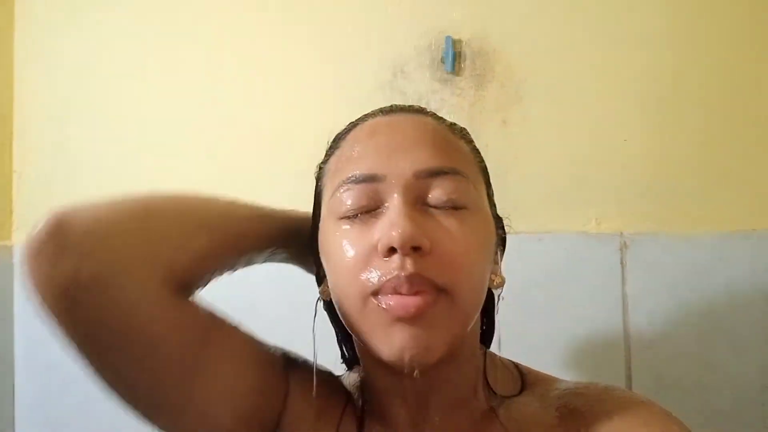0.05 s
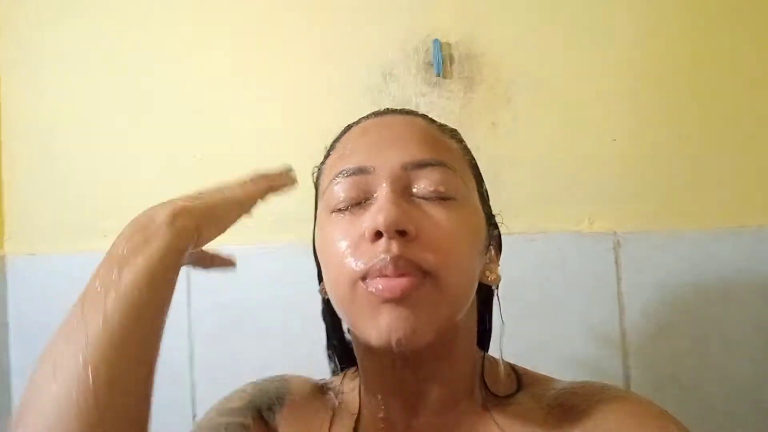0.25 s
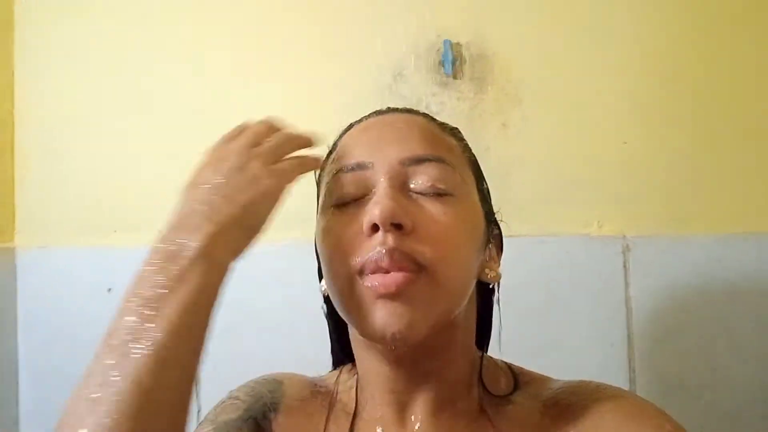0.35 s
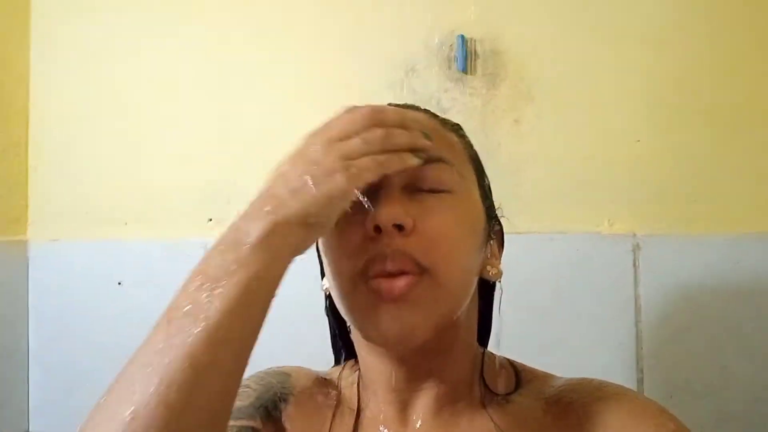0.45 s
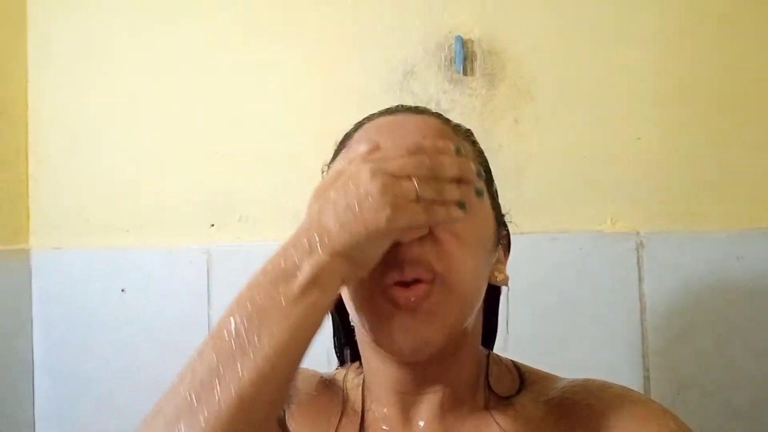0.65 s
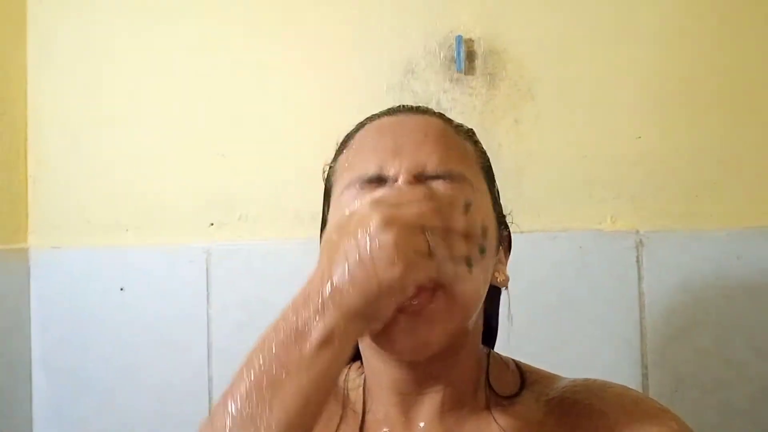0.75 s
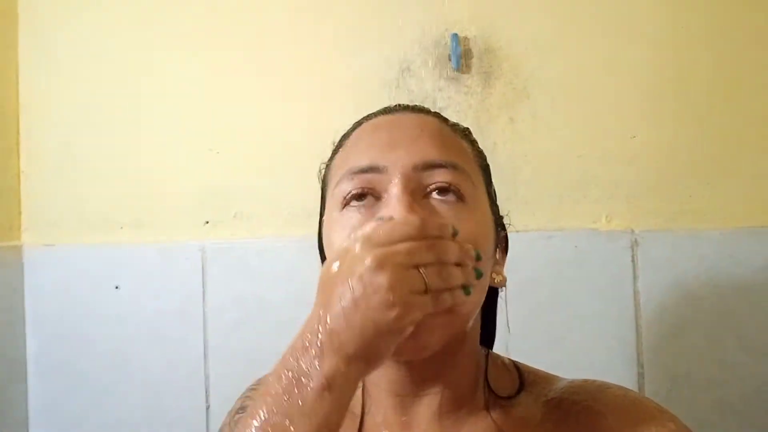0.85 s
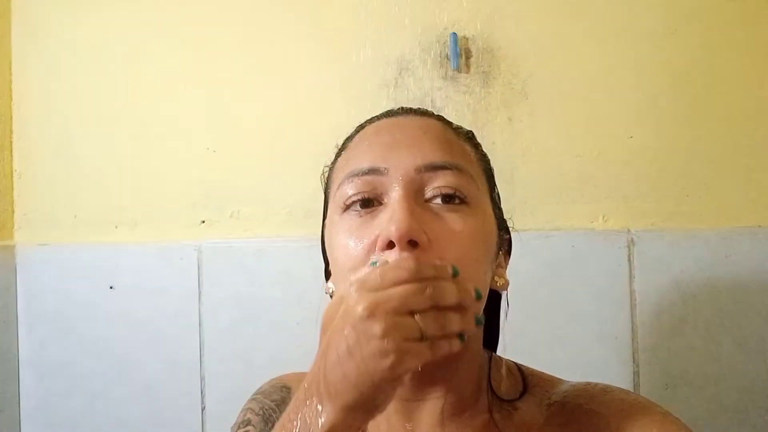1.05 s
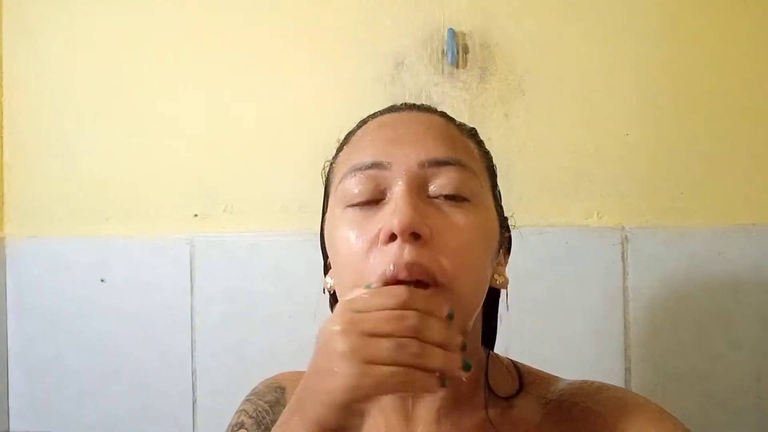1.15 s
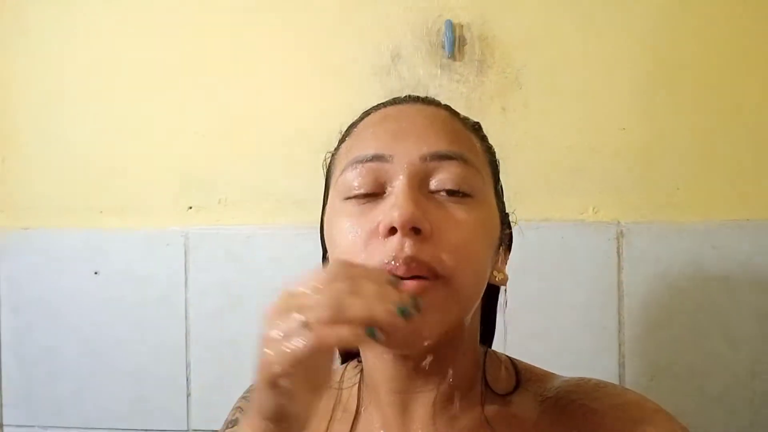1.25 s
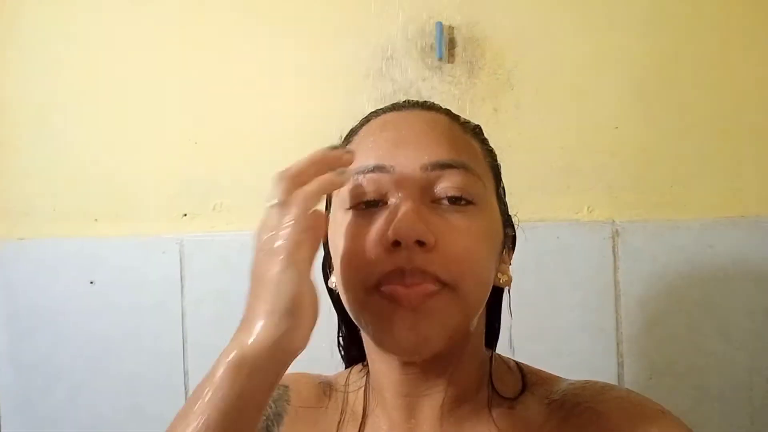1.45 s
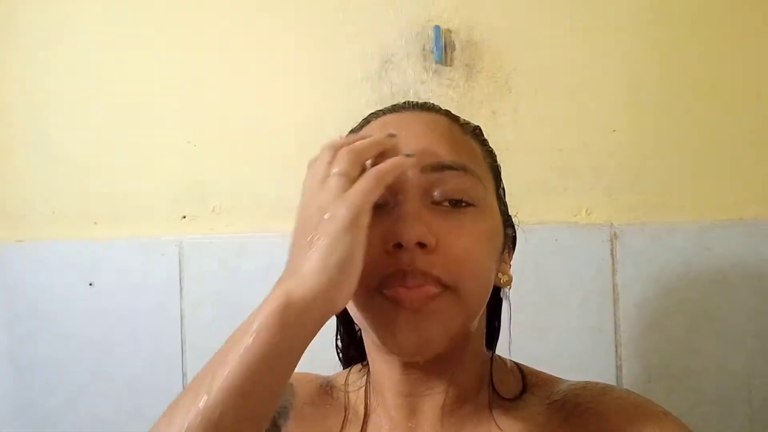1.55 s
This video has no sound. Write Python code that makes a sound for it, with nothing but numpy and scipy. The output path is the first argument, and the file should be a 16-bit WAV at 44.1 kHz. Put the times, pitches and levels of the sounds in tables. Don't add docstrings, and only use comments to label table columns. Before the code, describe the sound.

In a small, ringing tiled stall, close-miked water patters steadily, broken by a loud early splash and drain knock, fine ticking drops, low puffs from a moving hand, faint squelches and a few pitched drips.

```python
import sys
import numpy as np
from scipy import signal
from scipy.fft import rfft, irfft
from scipy.io import wavfile
from scipy.ndimage import uniform_filter1d

SR = 44100
rng = np.random.default_rng(int(sys.argv[2]) if len(sys.argv) > 2 else 0)


def amplitude_ratio(level_db):
    exponent = np.asarray(level_db, float) / 20
    return 10 ** exponent


def put_to_file(sound):
    columns = np.atleast_2d(sound).T
    safe = np.clip(columns, -1, 1)
    whole_steps = np.round(safe * 32767)
    wavfile.write(sys.argv[1], SR, whole_steps.astype(np.int16))


N = 70560
T = np.arange(N) / SR

# (time [s], level [dB])
FLOW = [(0.0, -40), (0.196, -35.5), (0.32, -44.5), (0.632, -30.5), (0.788, -29.5), (.9, -33.5),
        (.97, -34.5), (1.07, -35), (1.18, -33), (1.27, -36.5), (1.35, -36.5), (1.6, -39.5)]
# (frequency [Hz], density [dB per Hz])
PATTER_COLOUR = [(88, -62), (150, -27), (566, -20.5), (774, -17), (1020, -13.5), (7040, -3.5), (8560, -15),
                 (12400, 5.5), (16000, -14)]
# (frequency [Hz], density [dB per Hz])
RUMBLE_COLOUR = [(15, -46), (25, -19), (65, 6), (188, -10), (246, 1.5), (400, -46), (520, -50), (880, -120)]
# (frequency [Hz], decay by 60 dB [s])
ROOM_T60 = [(300, 0.41), (1000, 0.52), (4000, 0.43), (9000, 0.49), (15000, 0.47)]
# (frequency [Hz], likeness [0-1])
ALIKE = [(60, 0.7), (300, 0.99), (700, 0.25), (1400, 0.19), (3000, 0.02)]
# (frequency [Hz], width [Hz], level [dB])
STALL_MODES = [(249, 18, 14), (575, 23.6, 9)]
# (time [s], level [dB], centre [Hz], width / centre [ratio], burst [s])
SPLASHES = [(.144, -36, 7300, 0.16, 0.0085), (.19, -30, 7300, 0.18, .005), (0.248, -26, 4000, 2.3, 0.0044),
            (0.209, -21.5, 7500, 0.65, 0.0051), (0.205, -26, 4600, 0.39, 0.0043),
            (0.232, -20.5, 9000, 2.1, 0.03), (0.254, -9.5, 5100, 1.28, 0.0064),
            (0.253, -10.5, 12800, 0.29, 0.0087), (0.268, -11, 4500, 1.23, 0.01),
            (0.273, -17, 12700, 0.63, 0.0087), (0.29, -23, 2930, 0.27, 0.0058),
            (.557, -53, 11500, .3, .005), (0.59, -26, 4570, 0.49, 0.011),
            (0.672, -22.5, 11900, 1.44, 0.027), (0.768, -22, 4510, 0.48, 0.0066),
            (.69, -36, 2350, 0.87, 0.014), (0.848, -25, 12640, 0.91, 0.0088), (.198, -33.5, 3500, 1, .006),
            (0.141, -43.5, 2500, 0.43, 0.011), (0.986, -29.5, 6960, 0.42, .007),
            (1.091, -28, 12800, 0.56, 0.0033), (1.274, -36.5, 3800, 0.34, 0.0028),
            (1.294, -31.5, 6240, 0.3, 0.014), (1.342, -23.5, 11900, 0.71, 0.007),
            (1.471, -24, 10200, 1.07, 0.018), (1.5, -61, 4600, 0.34, 0.011),
            (1.544, -25.5, 13500, 0.31, 0.02)]
# (time [s], level [dB], pitch [Hz], ring
DRIPS = [(.142, -36, 1478, 32), (0.586, -50.5, 251, 19), (.715, -57, 253, 10), (1.275, -35, 3870, 20),
         (.147, -34, 2560, 12), (0.172, -32, 2420, 15), (0.688, -24, 2630, 29), (0.773, -35, 1485, 11),
         (0.903, -30.5, 2410, 18.7), (.941, -37, 2430, 12), (1.287, -30.5, 3730, 26),
         (1.391, -34.5, 1545, 11), (1.46, -43, 2197, 70)]
# (time [s], level [dB], centre [Hz], spit [s])
TICKS = [(.146, -23, 12300, 0.0033), (.165, -23, 12800, .003), (.189, -17.5, 11800, .003),
         (.202, -16, 12400, 0.0031), (0.234, -15, 13100, 0.0035), (.521, -33, 12600, .002),
         (0.557, -24, 11600, .002), (.573, -24, 12400, .002), (.601, -21.5, 12500, 0.0018),
         (0.674, -13, 12300, .002), (.705, -19, 12960, .002), (.743, -20, 13400, .002),
         (.753, -18, 14000, 0.0022), (0.77, -10.5, 12800, 0.0019), (.803, -15, 13000, 0.0025),
         (.846, -17.5, 13200, 0.003), (.862, -30, 13800, .002), (.949, -21, 12000, .002),
         (0.966, -16.5, 12700, 0.0024), (1.0917, -17, 14300, 0.0016), (1.152, -18.5, 11000, .002),
         (1.345, -21.5, 12000, 0.0034), (1.476, -20, 12300, .003), (1.312, -26, 12600, 0.0026),
         (1.391, -18, 13100, .002), (1.421, -19, 13930, 0.0023), (1.498, -30, 9000, .003),
         (1.567, -23, 8100, 0.0017)]
# (time [s], level [dB])
DRAIN_HITS = [(.22, -56), (.256, -31), (.275, -20), (.322, -28.5), (.344, -37.5), (.362, -48),
              (.405, -38.5), (.467, -44.5), (.58, -40), (.63, -39.5), (.665, -45.5), (.80, -51.5),
              (.84, -52.5), (1.33, -47), (1.46, -51), (1.49, -48), (1.515, -48.5), (1.545, -46.5)]
# (time [s], level [dB], length [s])
DRAUGHTS = [
    (0.236, -64, 0.072),
    (0.28, -56, 0.015),
    (0.944, -40.5, 0.018),
    (0.997, -44.5, 0.0074),
    (1.167, -54, 0.03),
    (1.32, -65, .07),
]
DRAUGHT_HZ = [54, 89, 156.5, 186, 75, 51]
# (time [s], level [dB], swing [Hz], length [s])
PUFFS = [
    (0.919, -40, 75, 0.0099),
    (0.9376, -33, 100, .003),
    (0.948, -25.5, 92, 0.0078),
    (0.993, -25, 100, 0.0069),
    (1.016, -35.5, 60.7, 0.016),
    (1.04, -44, 65, 0.013),
]
# (time [s], level [dB], centre [Hz], width / centre [ratio], burst [s])
WIPES = [(0.96, -49, 1900, 1.5, 0.092), (1.03, -48.5, 630, 1.7, 0.046), (1.14, -45.5, 1540, .4, .02),
         (1.112, -33, 3600, .25, 0.0037), (1.125, -41, 3500, 0.26, 0.005), (1.105, -36, 2440, 0.32, 0.015),
         (1.12, -38.5, 390, 0.68, 0.015), (1.06, -40, 960, 0.61, 0.0097), (.99, -46, 680, 0.37, 0.0039),
         (1.1, -42, 474, 0.73, 0.015), (1.25, -46.5, 3100, 0.37, 0.011), (1.27, -41, 2060, 0.79, .006),
         (1.235, -46, 526, 0.44, 0.012), (1.245, -50, 1460, 0.24, 0.021), (1.27, -57, 410, 0.45, 0.0085)]
# (time [s], level [dB], pitch [Hz], length [s])
POCKETS = [
    (1.061, -46, 1072, 0.0078),
    (1.088, -54, 1290, .005),
    (1.104, -46.5, 365, .016),
    (1.15, -48, 1417, .007),
    (1.168, -45, 1620, 0.0069),
    (1.191, -49, 1670, 0.0092),
]
# (frequency [Hz], gain [dB])
PHONE = [(200, -0.5), (2000, 3), (4300, 1), (5600, -1), (7000, 2.5), (8800, -2.5), (12500, -1), (15500, -2)]
# (frequency [Hz], left minus right [dB])
PORTS = [(60, -4), (380, 3), (700, -4), (1290, -4.5), (4400, -5), (8120, -5), (15000, -8)]

DRAIN_HZ, DRAIN_WIDTH_HZ = 769, 55


def rms1(x):
    return x / np.sqrt(np.mean(x ** 2))


def at(table, hz):
    table_hz, value = np.array(table).T
    return np.interp(np.log(hz), np.log(table_hz), value)


def band(x, hz, width):
    w = 2 * np.pi * min(hz, SR / 2.5) / SR
    a = np.sin(w) * np.sinh(np.arcsinh(width / 2) * w / np.sin(w))
    return signal.lfilter([a, 0, -a], [1 + a, -2 * np.cos(w), 1 - a], x)


def clicks(per_s, scatter_db):
    hit = rng.random(N) < per_s / SR
    push = rng.standard_normal(N)
    size = np.minimum(rng.exponential(size=N), 3)
    return rms1(hit * push * amplitude_ratio(scatter_db * size))


def walk(rate_hz):
    k = int(SR / rate_hz)
    steps = np.repeat(rng.standard_normal(N // k + 1), k)
    smooth = uniform_filter1d(uniform_filter1d(steps, k), k)
    return rms1(smooth[:N])


def burst(start, length):
    since = np.clip(T - start, 0, None)
    length = max(length, .001)
    rise = 1 - np.exp(-since / (0.26 * length))
    return rise * np.exp(-since / length)


def swell(start, length):
    return np.exp(-((T - start) / length) ** 2 / 2)


def swarm(start, length, per_s, scatter_db, hz, width):
    shape = burst(start, length)
    impacts = band(band(shape * clicks(per_s, scatter_db), hz, width), hz, width)
    return rms1(impacts) * np.sqrt(np.mean(shape ** 2))


def patter():
    drops_per_s, scatter_db, level_db = 1500, 2, -6
    swell_db, flicker_db = 1.4, 0
    together = walk(4.48)
    shared = clicks(drops_per_s / 4, scatter_db)
    out = 0
    for hz in 200 * 2 ** np.arange(0, 6.4, 1 / 3):
        drops = clicks(drops_per_s, scatter_db) + 0.7 * shared
        gain = amplitude_ratio(at(PATTER_COLOUR, hz) + swell_db * together + flicker_db * walk(5.4))
        out = out + gain * band(band(drops, hz, 0.42), hz, 0.42)
    return rms1(out) * amplitude_ratio(level_db + np.interp(T, *np.array(FLOW).T))


def pair(size):
    hz = np.arange(size // 2 + 1) * SR / size + 1
    mid, side = rfft(rng.standard_normal((2, size)))
    alike = np.clip(at(ALIKE, hz), 0, 1)
    return mid * np.sqrt(1 + alike) + side * np.sqrt(1 - alike) * np.array([[1], [-1]]), hz


def rumble():
    level_db, left_db = -68, -1.5
    noise, hz = pair(N)
    colour = amplitude_ratio(at(RUMBLE_COLOUR, hz) - 40 * (hz > 500) - 30 * (hz < 20))
    low = irfft(noise * colour, N) * amplitude_ratio(walk(10.2))
    return rms1(low) * amplitude_ratio(level_db + np.array([[left_db], [-left_db]]) / 2)


def room():
    size, first_wall_s = SR // 2, 0.0027
    noise, hz = pair(size)
    t, tail = T[:size], 0
    for centre in 125 * 2. ** np.arange(8):
        share = np.cos(np.pi / 2 * np.clip(np.log2(hz / centre), -1, 1)) ** 2
        tail = tail + irfft(noise * share, size) * amplitude_ratio(-60 * t / at(ROOM_T60, centre))
    tail = tail * np.clip(t / first_wall_s - 1, 0, 1)
    return tail / np.sqrt(np.mean(np.sum(tail ** 2, axis=1)))


def reverberate(x, count=6):
    spot_s, earlier_db = .006, -3
    step = int(spot_s * SR)
    spot = np.repeat(rng.integers(count, size=N // step + 1), step)[:N]
    wet = 0
    for k in range(count):
        share = np.sqrt(uniform_filter1d(1. * (spot == k), step // 4).clip(0))
        wet = wet + irfft(rfft(x * share, 2 * N) * rfft(room(), 2 * N), 2 * N)
    return wet[:, :N] + amplitude_ratio(earlier_db) * wet[:, N:]


def stall_boom(water):
    return sum(amplitude_ratio(db) * band(water, hz, wide / hz) for hz, wide, db in STALL_MODES)


def drain(water):
    trickle = amplitude_ratio(-40 + 1.1 * walk(12.4)) * clicks(240, 1.0)
    drive = amplitude_ratio(9.5) * water + trickle + slugs()
    return band(drive, DRAIN_HZ, DRAIN_WIDTH_HZ / DRAIN_HZ)


def splashes():
    thud = amplitude_ratio(-41) * swarm(.254, 0.028, 1500, 2.4, 580, 1.0)
    return thud + sum(amplitude_ratio(db) * swarm(start, length, 8000, 3.5, hz, 1.19 * width)
                      for start, db, hz, width, length in SPLASHES)


def drips():
    glide, flutter_db = 0.094, 3
    out = 0
    for start, db, hz, cycles in DRIPS:
        since = np.clip(T - start, 0, .2)
        life = cycles / hz / 2
        ring = np.sin(2 * np.pi * hz * since * (1 + glide * since / life / 8))
        out = out + amplitude_ratio(db + flutter_db * walk(300)) * burst(start, life) * ring
    return out


def ticks():
    return sum(amplitude_ratio(db) * swarm(start, length, 14000, 3.0, hz, 0.34) for start, db, hz, length in TICKS)


def slugs():
    out = 0
    for start, db in DRAIN_HITS:
        swing = np.sin(2 * np.pi * DRAIN_HZ * (T - start))
        out = out + amplitude_ratio(db + 10.5) * burst(start, 0.0026) * swing
    return out


def draughts():
    out = 0
    for (start, db, length), hz in zip(DRAUGHTS, DRAUGHT_HZ):
        air = rms1(band(band(rng.standard_normal(N), hz, 0.4), hz, 0.23))
        out = out + amplitude_ratio(db) * swell(start, length) * air
    return out


def puffs():
    out = 0
    for start, db, hz, length in PUFFS:
        out = out - amplitude_ratio(db) * swell(start, length) * np.cos(2 * np.pi * hz * (T - start))
    return out


def wipes():
    return sum(amplitude_ratio(db) * swarm(start, length, 4500, 2.2, hz, width)
               for start, db, hz, width, length in WIPES)


def pockets():
    rise, flutter_db = 0.029, 4.5
    out = 0
    for start, db, hz, length in POCKETS:
        v = T - start
        flutter = amplitude_ratio(db + flutter_db * walk(220))
        tone = np.sin(2 * np.pi * hz * v * (1 + rise * v / length / 2))
        out = out + flutter * swell(start, length) * tone
    return out


def scene():
    falling = patter() + splashes()
    water = falling + stall_boom(falling)
    blips = None
    pipe = drain(falling)
    blips = pockets()
    gurgle = amplitude_ratio(4 * np.array([walk(90), walk(90)]))
    hand, fine, drops = wipes(), ticks(), drips()

    to_room = water * amplitude_ratio(5) + hand * amplitude_ratio(0.5) + blips * amplitude_ratio(-2.5) + fine * amplitude_ratio(-3)
    wet = reverberate(to_room)
    wet = wet + reverberate(drops * amplitude_ratio(0.5) + pipe * gurgle[0] * amplitude_ratio(-7.5), count=1)

    near = water + fine + drops
    shadowed = np.roll(near, int(.0004 * SR)) * amplitude_ratio(-21)
    heard = wet + np.array([shadowed, near]) + hand + blips
    hz = np.arange(N // 2 + 1) * SR / N + 1
    tone_db = at(PHONE, hz) + at(PORTS, hz) * np.array([[.5], [-.5]])
    heard = irfft(rfft(heard) * amplitude_ratio(tone_db), N)
    house = rumble()
    wind = (puffs() + draughts()) * np.array([[1], [.04]])
    return heard + pipe * gurgle + house + wind


def roll_off(x):
    return signal.sosfilt(signal.butter(12, 16900, fs=SR, output="sos"), x)


def record(dry):
    ceiling, top_hz = .93, 15900
    soft = dry / (1 + (dry / ceiling) ** 4) ** (1 / 4)
    top_cut = signal.ellip(10, .2, 80, top_hz, fs=SR, output="sos")
    return roll_off(signal.sosfilt(top_cut, soft))


dry = scene()
out = record(dry)
put_to_file(out)
```